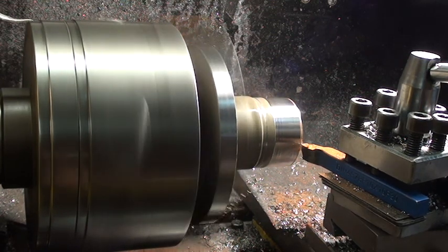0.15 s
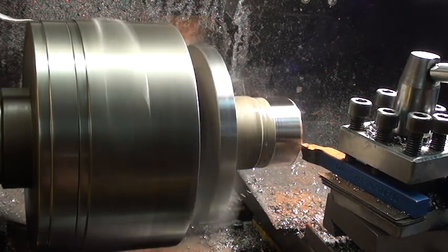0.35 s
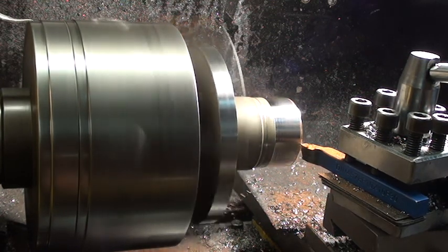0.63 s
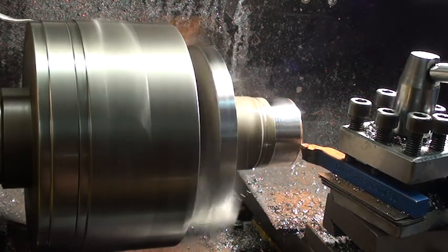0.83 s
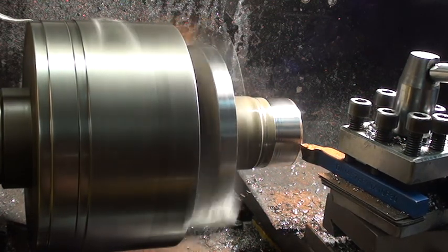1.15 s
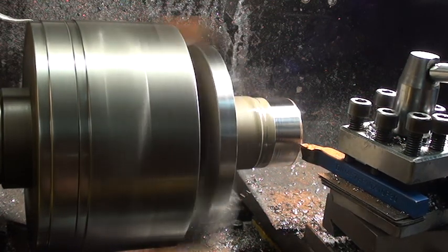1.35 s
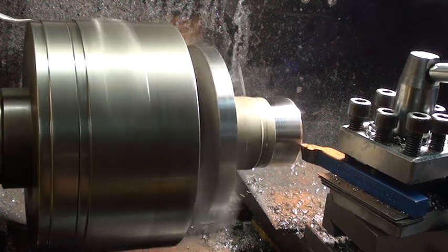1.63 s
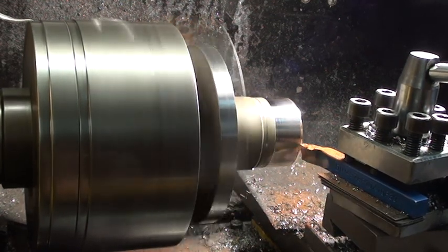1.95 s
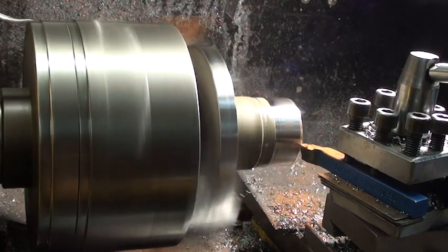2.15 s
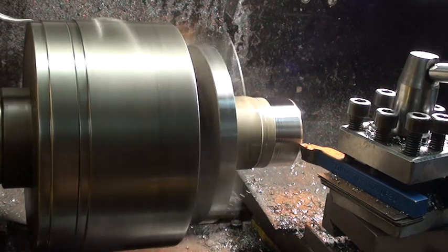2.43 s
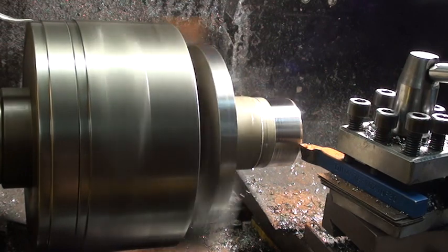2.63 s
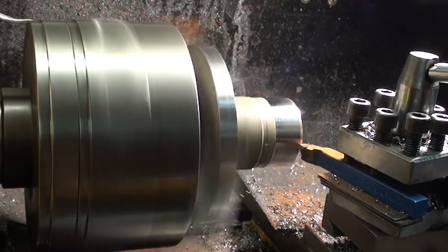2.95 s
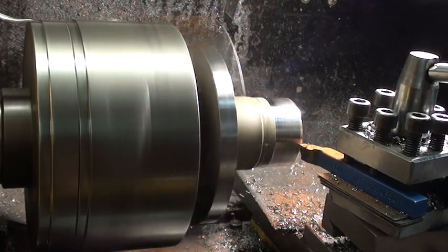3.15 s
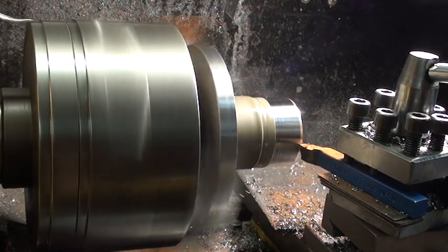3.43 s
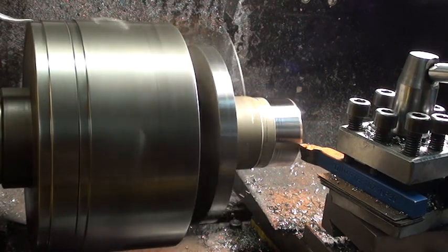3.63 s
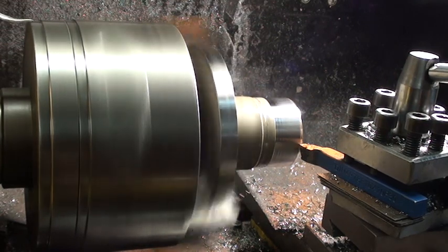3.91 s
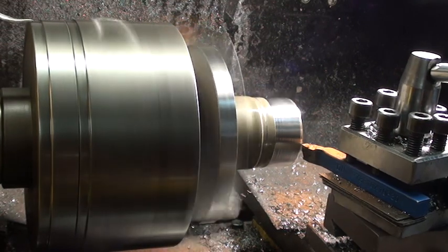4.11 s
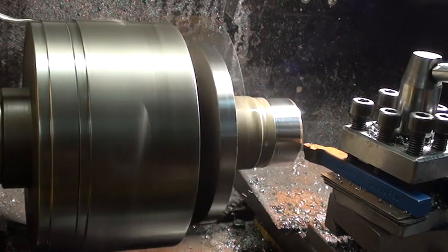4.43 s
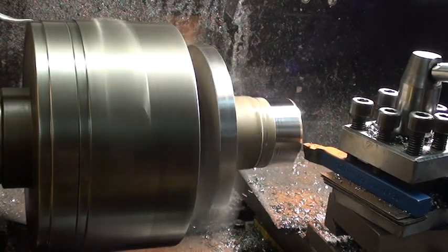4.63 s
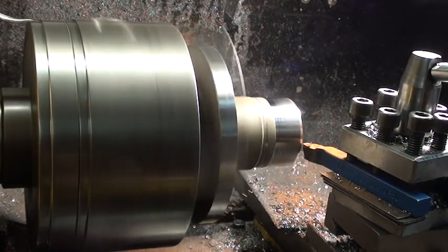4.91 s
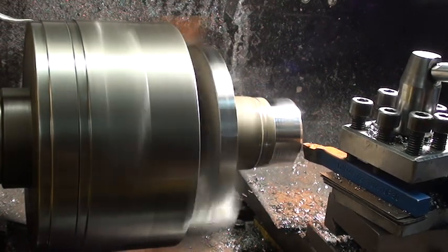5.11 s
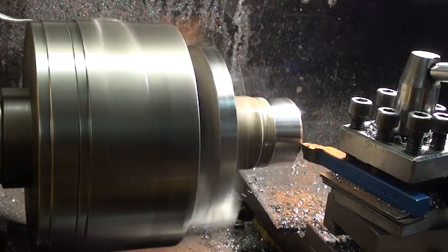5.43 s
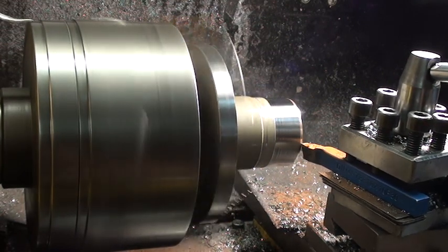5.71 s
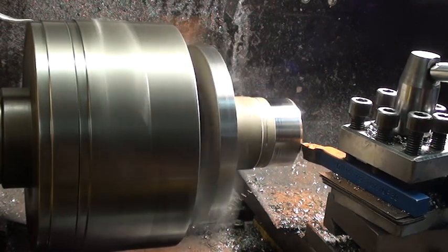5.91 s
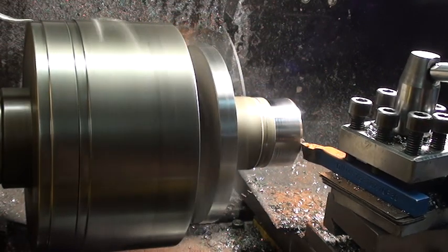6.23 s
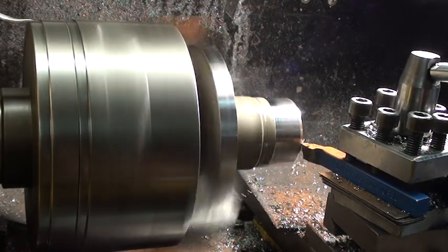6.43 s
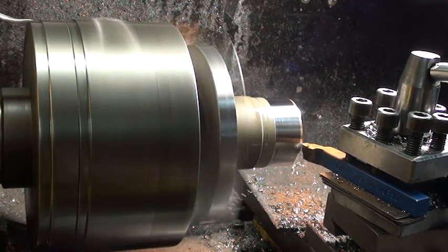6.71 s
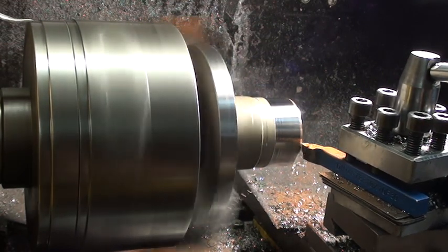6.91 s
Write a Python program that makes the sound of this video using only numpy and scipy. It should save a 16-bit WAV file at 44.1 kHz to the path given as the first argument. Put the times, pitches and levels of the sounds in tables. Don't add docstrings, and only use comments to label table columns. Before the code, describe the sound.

Lathe drive whines steadily while a tool squeals piercingly once per turn, pauses with knocks and ticking chips, then locks into one long loud screech.

```python
import sys
import numpy as np
from scipy import signal
from scipy.fft import rfft, irfft, next_fast_len
from scipy.io import wavfile
from scipy.ndimage import uniform_filter1d

SR = 44100
rng = np.random.default_rng(int(sys.argv[2]) if len(sys.argv) > 2 else 0)


def generate_wav(sig):
    pcm = np.round(np.clip(np.atleast_2d(sig).T, -1, 1) * 32767).astype(np.int16)
    wavfile.write(sys.argv[1], SR, pcm)


def natural_amplitude(level_db):
    exponent = np.asarray(level_db, float) / 20
    return 10 ** exponent


N = 311341
TIME_S = np.arange(N) / SR

# time in seconds, pitch in Hz, level in dB rms.
LONG_SQUEAL = [
    (5.92, 5598, -23.7),
    (5.99, 5592, -13.5),
    (6.04, 5580, -9.5),
    (6.08, 5595, -10),
    (6.1, 5545, -10.1),
    (6.4, 5521, -11.1),
    (6.62, 5500, -10.8),
    (6.7, 5520, -11),
    (7.06, 5496, -8.7),
]
TURN_S, FIRST_SKIP_S = .11025, 6.1587


def rms_one(x):
    return x / np.sqrt(np.mean(x ** 2) + 1e-20)


def in_time(rows):
    s, *columns = np.transpose(rows)
    return [np.interp(TIME_S, s, c) for c in columns]


def at_hz(points, hz):
    freqs, levels = np.array(points)[:, 0], np.array(points)[:, 1]
    return np.interp(np.log(hz), np.log(freqs), levels)


def drift(rate_hz):
    r = np.exp(-16 * np.pi * rate_hz / SR)
    white = rng.standard_normal(N // 8 + 4002)
    slow = signal.lfilter([1], [1, -2 * r, r * r], white)[4000:]
    return np.interp(np.arange(N) / 8, np.arange(len(slow)), rms_one(slow))


def swells(rows, values, rise, fall):
    out = np.zeros(N)
    for (s, length, *_), value in zip(rows, values):
        near = slice(max(int((s - .1) * SR), 0), int((s + length + .1) * SR))
        onset = 1 + np.tanh((TIME_S[near] - s) / rise)
        release = 1 + np.tanh((s + length - TIME_S[near]) / fall)
        out[near] += value * onset * release / 4
    return out


def resonate(x, hz, width_hz):
    r = np.exp(-np.pi * width_hz / SR)
    zeros = [(1 - r * r) / 2, 0, (r * r - 1) / 2]
    return signal.lfilter(zeros, [1, -2 * r * np.cos(2 * np.pi * hz / SR), r * r], x)


def stereo_noise(spectrum):
    # frequency in Hz, left-right likeness from 0 to 1.
    likeness = [(60, 0.98), (300, 1), (700, 0.91), (1600, 0.91), (4000, 0.92), (9000, 0.95), (11000, 1)]
    # frequency in Hz, left minus right in dB.
    lean = [(60, -0.5), (140, -1), (310, 0), (720, 1), (1650, 2), (3780, 2), (8650, -1)]
    size = next_fast_len(N)
    hz = np.maximum(np.fft.rfftfreq(size, 1 / SR), 10)
    mid, side = rfft(rng.standard_normal((2, size)))
    alike = np.clip(at_hz(likeness, hz), 0, 1)
    sign = np.array([[1], [-1]])
    pair = np.sqrt(1 + alike) * mid + sign * np.sqrt(1 - alike) * side
    pair = pair * natural_amplitude(sign * at_hz(lean, hz) / 2)
    return rms_one(irfft(pair * natural_amplitude(at_hz(spectrum, hz)), size)[:, :N])


def panned(x, lean_db):
    return x * natural_amplitude(np.array([[.5], [-.5]]) * lean_db)


def drive():
    # frequency in Hz, level in dB rms.
    switching = [(6422, -52), (6944, -78), (7194, -38.5), (7410, -67), (7502, -53), (7628, -57),
                 (7683, -47), (7807, -42.5), (7932, -33), (8057, -48.5), (8182, -55), (8306, -57),
                 (8795, -49), (15003, -79)]
    # frequency in Hz, width in Hz, level in dB rms.
    housing = [(69.4, 9.5, -67.5), (12800, 61, -73.5), (209, 12, -47), (345.3, 18.4, -41.5),
               (380.4, 3, -45.5), (754, 4.1, -48), (884.6, 15.7, -39.5), (973, 10.5, -40.5),
               (1176, 15, -44), (1343, 24, -43), (1834, 6, -41), (2256, 50, -47), (3816, 50, -48.5)]
    # frequency in Hz, peak level in dB.
    meshes = [(48.4, -66), (344, -47), (382, -45), (760, -41), (984, -46), (1847, -45)]
    # frequency in Hz, level in dB per Hz.
    idle = [(30, -48), (60, -51), (110, -17), (190, -13.5), (340, -11), (500, -9.5), (900, -5.5),
            (1800, -6), (2600, -11.5), (3400, -15), (5200, -18), (7600, -9), (9200, -22.5), (11500, -50),
            (15700, -66)]
    carrier_hz, twist_rad = 7932, .5
    wander = drift(0.94)
    lines = np.zeros(N)
    for hz, db in switching:
        offset_hz = hz - carrier_hz
        phase = hz * (2 * np.pi * TIME_S + .00002 * wander) + twist_rad * (offset_hz / 125) ** 2
        phase = phase + 1.5 * wander * (abs(offset_hz) % 124.7 > 3)
        lines += natural_amplitude(db) * np.sin(phase)
    waver = np.cumsum(drift(8.01)) / SR
    tones = np.zeros(N)
    for hz, db in meshes:
        turns = hz * TIME_S + 2.902 * np.roll(waver, round(hz * 37))
        tones += natural_amplitude(db) * np.sin(2 * np.pi * turns)
    white = stereo_noise([(100, 0), (9000, 0.0048)])
    gears = sum(natural_amplitude(db) * rms_one(resonate(white, hz, width_hz)) for hz, width_hz, db in housing)
    running = natural_amplitude(-32 + 1.2 * drift(22)) * stereo_noise(idle)
    whine = panned(np.sqrt(2) * natural_amplitude(0.8 * drift(12)) * lines, lean_db=2.0)
    return running + 0.79 * gears + panned(1.11 * tones, lean_db=-1.3) + whine


def cutting(gain_db, rasps):
    # start in seconds, length in seconds.
    in_metal = [
        (-1, 4.15),
        (5.392, 3),
    ]
    # time in seconds, level in dB.
    unrest = [(0, -21), (.6, -16), (.9, -14.5), (1.5, -22), (1.8, -25), (2.05, -16.5), (2.3, -18),
              (2.5, -30), (2.72, -30), (2.765, -47), (2.81, -23), (3.0, -26), (3.15, -44), (5.39, -33.5),
              (5.84, -36), (6.015, -21), (6.021, -34), (7.06, -32)]
    # start in seconds, chip hiss in dB, bed rumble in dB.
    stages = np.array([
        (0, -35.5, -34),
        (5.391, -37, -52),
        (6.05, -28, -37),
    ])
    # frequency in Hz, level in dB per Hz.
    hiss_spectrum = [(2500, -18), (3500, -15), (4300, -8), (4900, -10.5), (6500, 1), (8000, -4),
                     (9200, -13.5), (10500, -25.5), (15500, -63)]
    rumble_spectrum = [(60, -57), (95, -32), (130, -17.5), (200, 5.0), (300, -1.5), (420, -5), (700, -42.0)]
    hiss_follows, rumble_follows = 0.22, 0.17
    ring_free_hz, ring_sag_hz = 5573, 580
    lift_s, lift_depth = .032, .75

    unrest_db, = in_time(unrest)
    stage = np.searchsorted(stages[1:, 0], TIME_S)
    swing_db = np.outer([hiss_follows, rumble_follows], unrest_db + 25.5)
    hiss_db, rumble_db = stages[stage, 1:].T + gain_db + swing_db

    ring_db = unrest_db + gain_db
    ring_hz = np.where(stage == 2, in_time(LONG_SQUEAL)[0], ring_free_hz - ring_sag_hz * natural_amplitude(ring_db))
    lift = np.cos(np.pi * (TIME_S - FIRST_SKIP_S - lift_s) / TURN_S) ** 6
    ring_db = ring_db + 20 * np.log10(1 - lift_depth * lift)
    stir = drift(76) + 1j * drift(50)
    ring = (stir * np.exp(2j * np.pi * np.cumsum(ring_hz) / SR)).real

    rasp_level = natural_amplitude(rasps[:, 2])
    hiss_swell = 1 + 4.4 * swells(rasps, rasp_level, rise=.01, fall=0.024)
    hiss = natural_amplitude(hiss_db + 2.5 + 3.04 * drift(65)) * hiss_swell * stereo_noise(hiss_spectrum)
    hiss = hiss + natural_amplitude(4.0) * resonate(hiss, hz=4800, width_hz=300)

    skips = np.arange(FIRST_SKIP_S, N / SR, TURN_S)
    thumps = swells(rasps, 15 * rasp_level, rise=0.011, fall=0.009)
    thumps = thumps + swells([(s, .04) for s in skips], [2.2] * len(skips), rise=0.011, fall=0.012)
    rumble = natural_amplitude(rumble_db - 4) * (1 + thumps) * stereo_noise(rumble_spectrum)

    engaged = swells(in_metal, [1, 1], rise=0.0042, fall=0.01807)
    return engaged * (panned(natural_amplitude(ring_db) * ring, lean_db=3.5) + hiss + rumble)


def rubbing(rows, broad_db, grain_db, edge_s):
    # frequency in Hz, width in Hz, level in dB.
    post_modes = [(893, 44, -1), (1104, 12, -3.5), (1416, 450, 4), (1874, 16, -7), (2140, 37, -3),
                  (2496, 59, -8.5), (4054, 85, -6), (4170, 56, -21)]
    grit_spectrum = [(300, -11.5), (800, -3.5), (2400, -2.0), (2900, -9), (4300, -20), (6000, -38.5),
                     (10000, -48.5), (16000, -77.0)]
    grit = stereo_noise(grit_spectrum) * natural_amplitude(grain_db * drift(92))
    body = sum(natural_amplitude(db) * rms_one(resonate(grit, hz, width_hz)) for hz, width_hz, db in post_modes)
    strokes = swells(rows, natural_amplitude(np.array(rows)[:, 2]), rise=edge_s, fall=edge_s)
    return strokes * rms_one(body + natural_amplitude(broad_db) * grit)


def squeal():
    # start in seconds, length in seconds, level in dB rms, roughness 0-1.
    high_sides = [(.047, .049, -12, 0.15), (.164, .05, -12, 0.15), (.271, .057, -11, 0.05),
                  (.388, 0.043, -11, 0.24), (.502, 0.068, -12.5, 0.39), (.608, 0.098, -14, 0.08),
                  (0.711, 0.056, -10.5, .05), (0.772, .063, -10, 0.09), (.842, 0.099, -11.5, 0.08),
                  (.961, 0.089, -11.5, 0.13), (1.12, 0.043, -12, 0.21), (1.22, .056, -10, 0.1),
                  (1.342, 0.041, -11.5, 0.14), (1.452, 0.047, -10.5, 0.26), (1.582, 0.022, -13, 0.12),
                  (1.698, .015, -9.5, 0.25), (1.803, 0.025, -12.5, .05), (1.88, 0.056, -8.5, 0.24),
                  (1.938, 0.042, -21.5, .61), (1.989, 0.068, -11, 0.45), (2.103, 0.083, -13.5, 0.74),
                  (2.229, .068, -13, .55), (2.35, .023, -11.5, 0.27), (2.379, 0.025, -12, 0.19),
                  (2.494, 0.025, -16, 0.2), (2.602, .027, -19, .3), (2.713, 0.025, -28, .5),
                  (2.835, 0.0084, -8, .05), (2.945, .016, -10.5, .1), (3.04, 0.033, -32, .38)]
    # start in seconds, length in seconds, level in dB rms, roughness 0-1.
    chirps = [
        (5.439, .022, -12.5, 0.04),
        (5.571, .041, -28.5, .62),
        (5.658, 0.0505, -31.5, .53),
        (5.765, 0.0401, -27, .41),
        (5.882, .029, -21.5, .46),
    ]
    scoop = [(0, .3), (.55, 1.2), (1.0, .7)]
    free_hz, warm_hz_per_s = 5562, 4.0
    sag_hz, drag_hz, build_s = 159.7, 947.6, .04
    tail_s, tail_db, tail_rough_db, tail_rough = .045, -24, 20, .6
    slip_rad = .45

    bites = np.vstack([high_sides, chirps])
    tails, marks = [], []
    for s, length, db, rough in bites:
        trail_db = db + tail_db + tail_rough_db * rough - 200 * max(.05 - length, 0)
        tails.append((s + length, tail_s, trail_db, tail_rough))
        full_sag_hz = natural_amplitude(db) * np.tanh(length / build_s) * (sag_hz + drag_hz * rough ** 2)
        for part, share in scoop:
            marks.append((s + part * length, free_hz + warm_hz_per_s * s - share * full_sag_hz))
    marks.sort()
    rows = np.vstack([bites, tails])
    levels = natural_amplitude(rows[:, 2])

    long_hz, long_db = in_time(LONG_SQUEAL)
    lock_s = LONG_SQUEAL[0][0]
    locked = np.arange(N) > lock_s * SR
    strength = np.where(locked, natural_amplitude(long_db), swells(rows, levels, rise=0.0045, fall=0.0082))

    settling = in_time([(5.92, .2), (6.0, .18), (6.09, .12), (6.11, .09), (7.06, .06)])[0]
    rough_swell = swells(rows + [.008, -0.003, 0, 0], levels * rows[:, 3], rise=0.0072, fall=0.0049)
    rough = np.where(locked, settling, np.clip(rough_swell / (strength + 0.0024), .04, 1))

    hz = np.where(locked, long_hz, in_time(marks)[0]) + 7 * drift(37.2)
    hz = hz - 200 * np.where(locked, 0, strength - .25)
    slips = np.zeros(N)
    slips[(np.arange(FIRST_SKIP_S, N / SR, TURN_S) * SR).astype(int)] = slip_rad
    phase = 2 * np.pi * np.cumsum(hz) / SR + np.cumsum(uniform_filter1d(slips, size=20))

    chatter_turns = 160 * np.clip(3 * rough - .6, 0, 1).cumsum() / SR
    chatter = (drift(94) + 1j * drift(68)) * np.exp(-2j * np.pi * chatter_turns)
    shake = (1 + rough * chatter) / np.sqrt(1 + 2 * rough ** 2)
    shake = 1.26 * shake / (1 + abs(shake) ** 3) ** (1 / 3) * natural_amplitude(.7 * drift(30))
    tone = shake * np.exp(1j * phase)

    octave_share = np.where(locked, natural_amplitude(-38.5 - 61 * settling), natural_amplitude(-53.0) + natural_amplitude(-23.5) * rough ** 1.3)
    overdriven = 2.9 * strength * octave_share
    octave = overdriven * natural_amplitude(3.5 * drift(60)) * (tone ** 2 * np.exp(.8j * drift(66))).real
    sound = np.sqrt(2) * strength * (tone.real + octave)
    spread = natural_amplitude(-15) * strength * drift(6) * tone.imag * np.array([[1], [-1]])
    lean_db = np.where(locked, -2.5 * (TIME_S - lock_s), .8)
    return panned(sound, lean_db) + spread, strength


def chips():
    # time in seconds, crack peak in dB, crack frequency in Hz,
    # low ring in dB, high ring in dB.
    strikes = [(3.460, -22, 5100, -62, -61), (3.967, -29.5, 3850, -27.5, -58),
               (4.331, -23, 4870, -45.5, -44), (4.526, -17.5, 4960, -33, -46), (4.790, -18, 4870, -45, -53),
               (4.958, -24, 5336, -38, -26), (5.102, -24, 6900, -23.5, -39), (5.2178, -9.5, 6200, -17, -16),
               (5.350, -15, 6840, -27, -37.5), (5.393, -18, 5460, -48, -55.5),
               (5.776, -19, 3920, -15, -22.5)]
    # frequency in Hz, level in dB, 60 dB decay time in seconds.
    guard_low = [(4000, -5, 0.06), (7070, 4.5, 0.053)]
    # frequency in Hz, level in dB, 60 dB decay time in seconds.
    guard_high = [(8200, -1.5, 0.048), (10700, -18, 0.067), (11140, -10, .049), (13000, -33, .079)]
    out, t = np.zeros(N), np.arange(round(.1 * SR)) / SR

    def ringing(modes):
        return sum(natural_amplitude(db - 60 * t / t60) * np.sin(2 * np.pi * hz * t) for hz, db, t60 in modes)

    low, high = ringing(guard_low), ringing(guard_high)
    for s, crack_db, hz, low_db, high_db in strikes:
        burst = resonate(resonate(rng.standard_normal(len(t)), hz, 1300), hz, 3000)
        crack = rms_one(burst) * np.exp(-t / .004)
        out[round(s * SR):][:len(t)] += 0.59 * natural_amplitude(crack_db) * crack + natural_amplitude(low_db) * low + natural_amplitude(high_db) * high
    return panned(out, lean_db=-3.0)


def camera_gain_db():
    # time in seconds, lasting drop in dB.
    grabs = [(0.752, 3.0), (1.2, 0.8), (1.89, 2), (3.1, 0.74), (5.988, 2), (6.019, 7.5), (6.09, 8.0),
             (6.13, 1.6), (6.33, 1), (6.7, 0.8), (7.03, 0)]
    start_db, creep_db_per_s = -4.0, 3.0
    grab_s, rebound, rebound_s = 0.0033, 0.48, 0.041
    drop_db = np.zeros(N)
    for s, db in grabs:
        onset = (1 + np.tanh((TIME_S - s) / grab_s)) / 2
        drop_db += db * onset * (1 + rebound * np.exp(-np.maximum(TIME_S - s, 0) / rebound_s))
    return start_db + creep_db_per_s * TIME_S - drop_db


def scene():
    # start in seconds, level in dB rms.
    low_sides = [(-.032, -24.5), (0.084, -26.5), (0.19, -27.5), (.301, -26.5), (0.42, -25.5), (0.537, -27),
                 (0.64, -29.5), (0.711, -32.5), (.923, -33.5), (1.04, -33.5), (1.16, -32), (1.265, -29),
                 (1.391, -28), (1.492, -28), (1.595, -27.5), (1.7, -29), (1.822, -24), (1.933, -23.5),
                 (2.046, -24), (2.16, -24), (2.264, -25), (2.353, -29), (2.472, -30.5), (2.58, -30.5),
                 (2.686, -31.5), (2.84, -27), (2.935, -28), (3.02, -33.5), (3.14, -36.5)]
    # start in seconds, length in seconds, level in dB rms.
    crank = [
        (3.794, 0.031, -30),
        (3.875, 0.02, -28),
        (3.958, 0.025, -26),
        (4.045, 0.02, -27.5),
        (4.132, 0.028, -28.5),
        (4.215, 0.014, -28),
        (4.981, 0.022, -31),
        (5.073, 0.021, -22.5),
        (5.235, 0.025, -30.5),
    ]
    tone, strength = squeal()
    gain_db = camera_gain_db()
    duck = natural_amplitude(-9 * uniform_filter1d(strength, size=600))
    rasps = np.array([(s, 0.073, db) for s, db in low_sides])
    rasp = rubbing(rasps, broad_db=5, grain_db=1.5, edge_s=.011)
    knocks = 1.17 * rubbing(crank, broad_db=1.5, grain_db=3.5, edge_s=0.0076)
    friction = cutting(gain_db, rasps) + rasp + knocks
    air = natural_amplitude(-70.0) * stereo_noise([(8000, -34), (11000, -2.0), (15000, -7.0)])
    return natural_amplitude(gain_db) * duck ** 0.23 * drive() + duck * friction + tone + chips() + air


def roll_off(x):
    return signal.sosfilt(signal.butter(12, 15800, fs=SR, output="sos"), x)


def record(dry):
    rounded = dry / (1 + (dry / .8) ** 8) ** (1 / 8)
    clean = signal.sosfilt(signal.butter(3, 45, "high", fs=SR, output="sos"), rounded)
    return roll_off(clean)


dry = scene()
out = record(dry)
generate_wav(out)
```